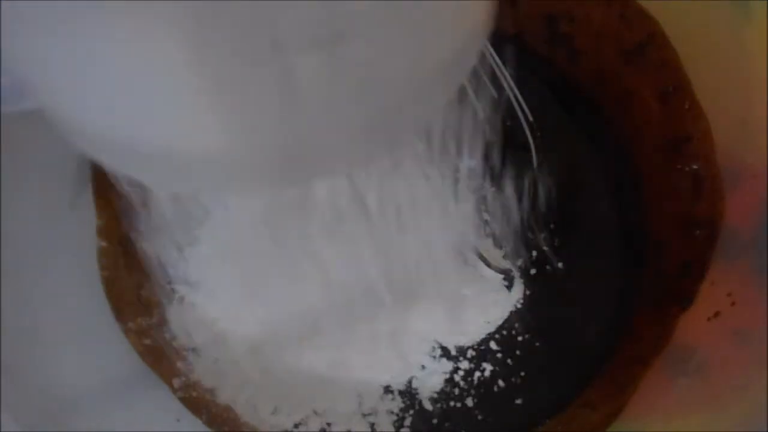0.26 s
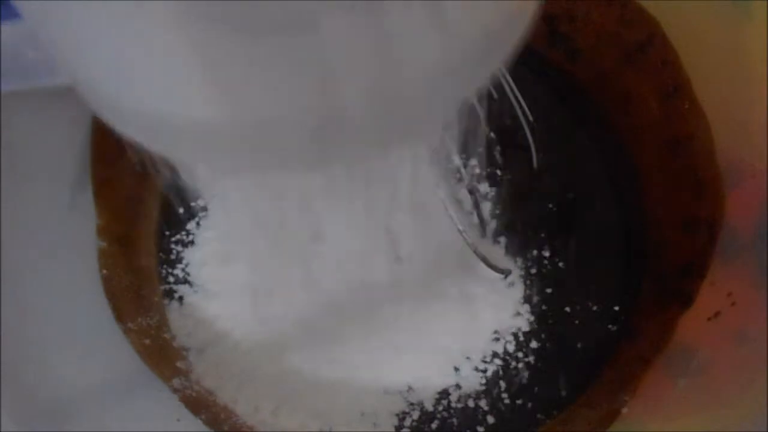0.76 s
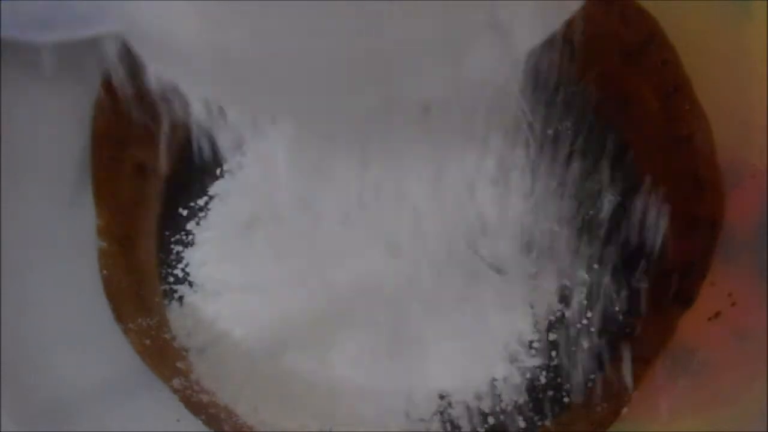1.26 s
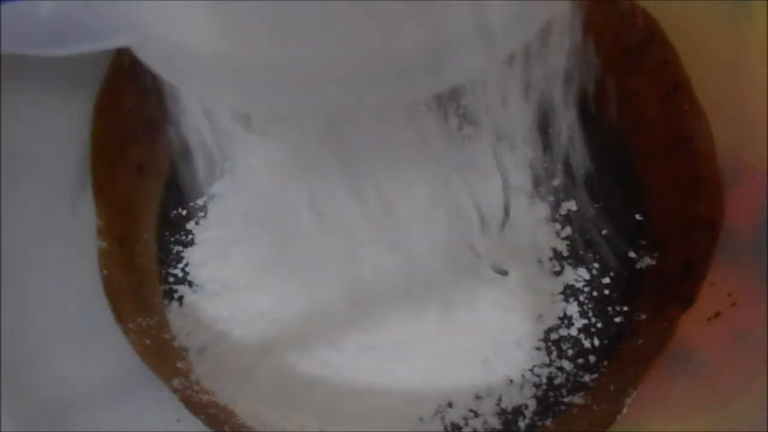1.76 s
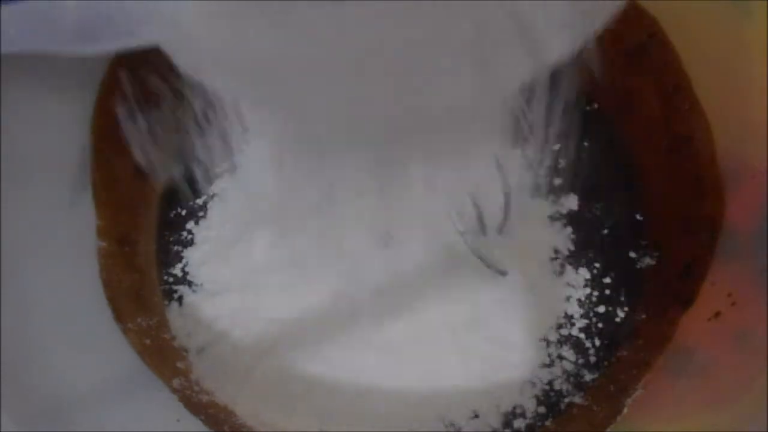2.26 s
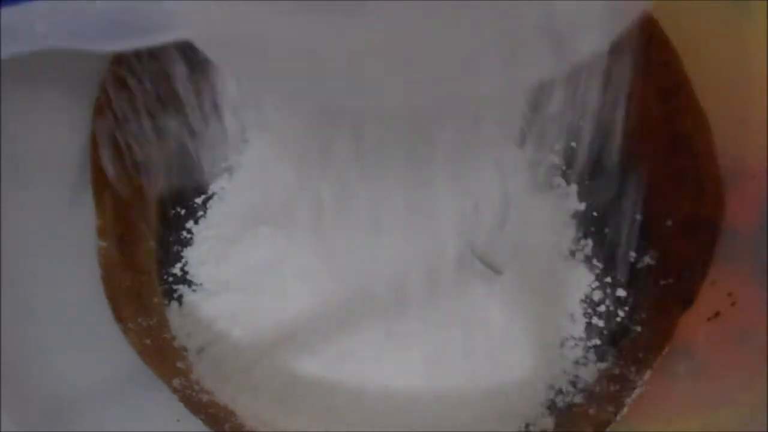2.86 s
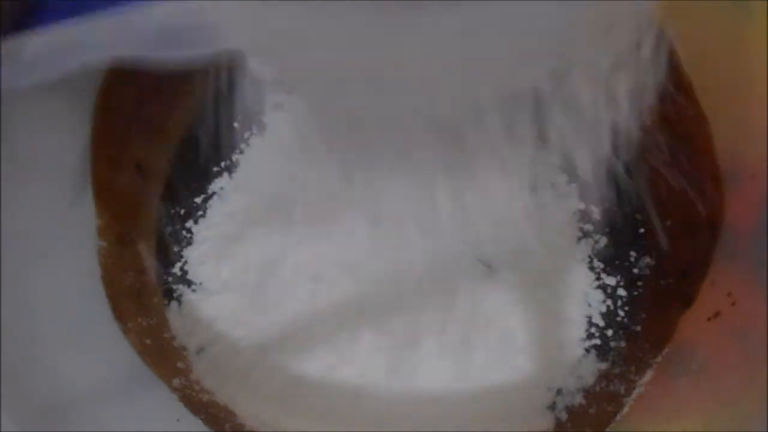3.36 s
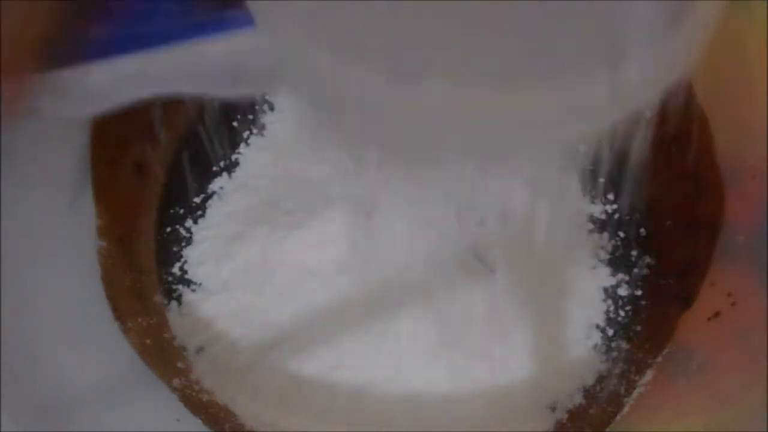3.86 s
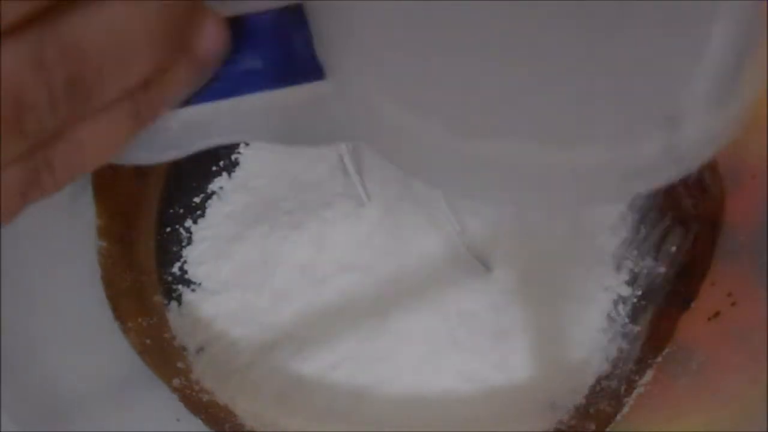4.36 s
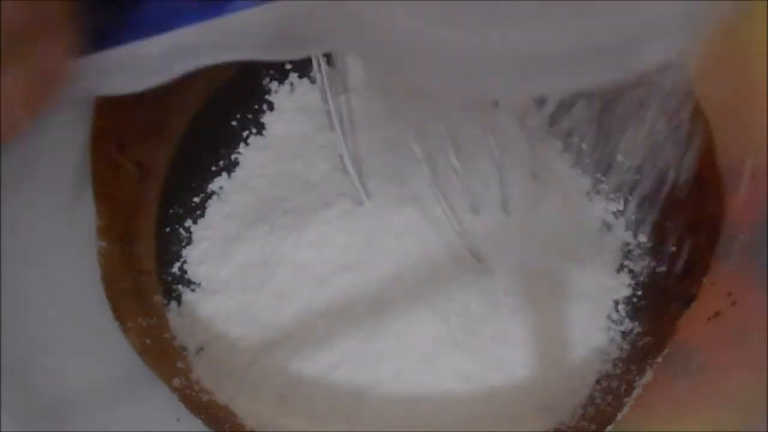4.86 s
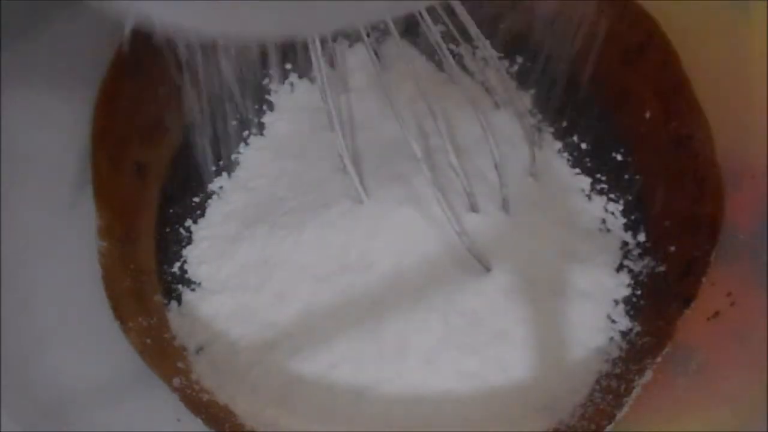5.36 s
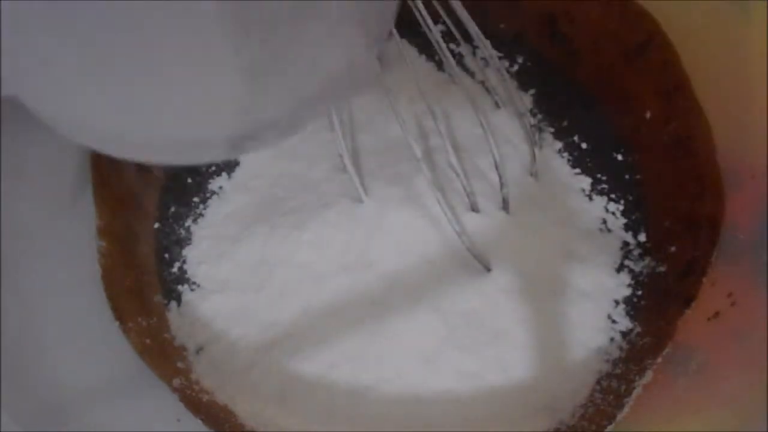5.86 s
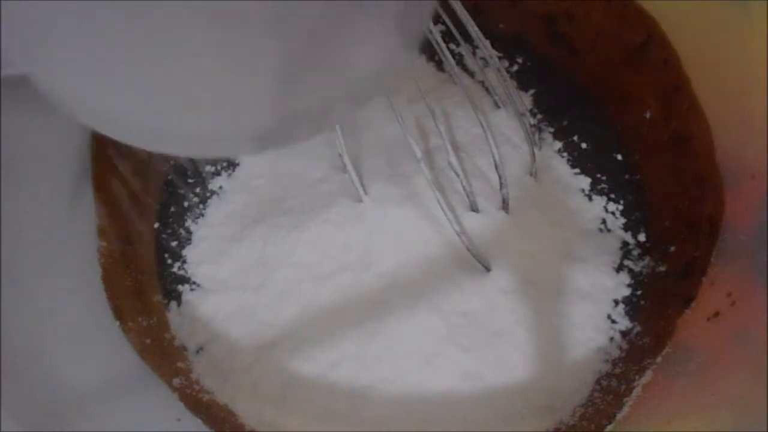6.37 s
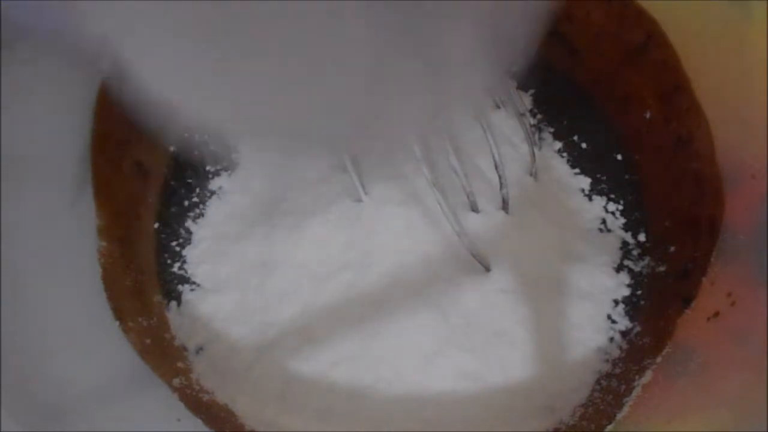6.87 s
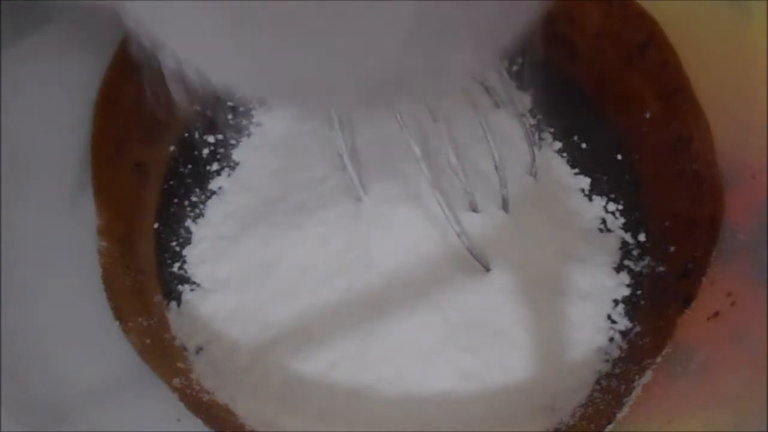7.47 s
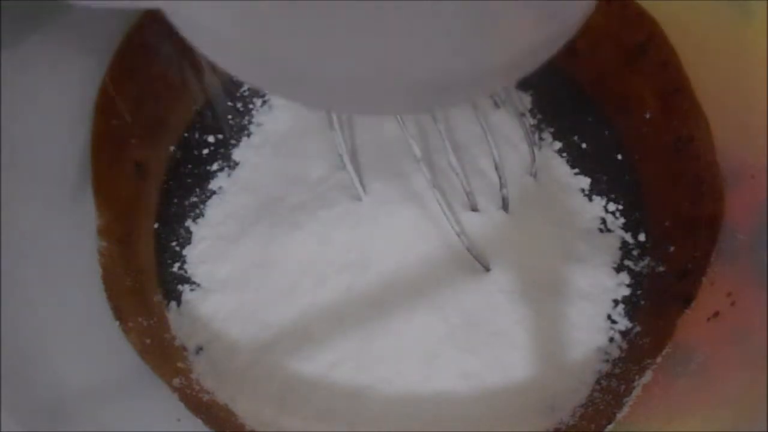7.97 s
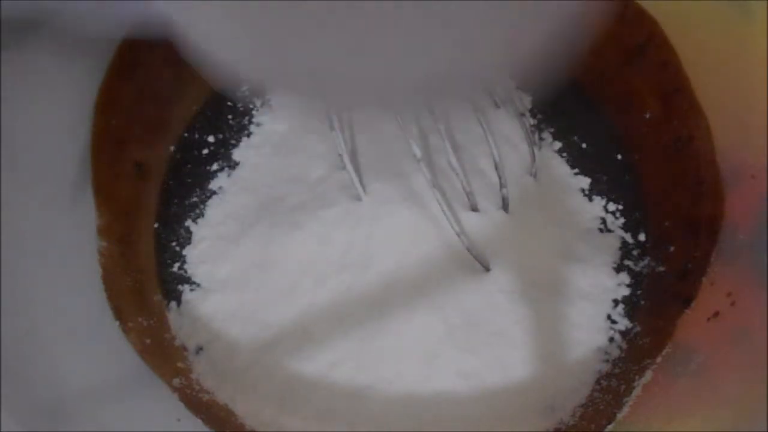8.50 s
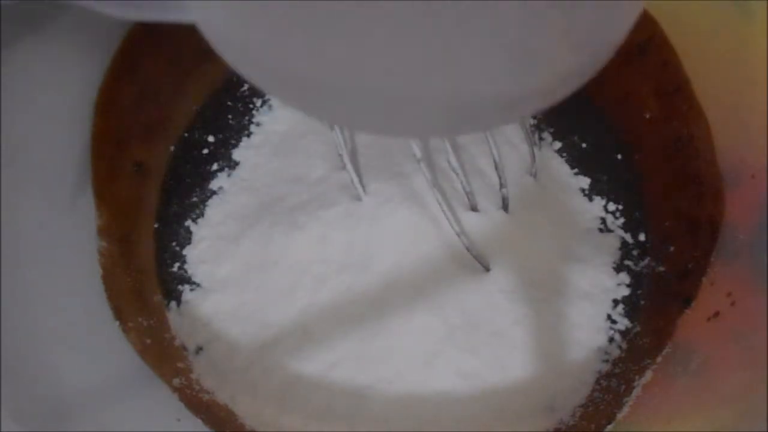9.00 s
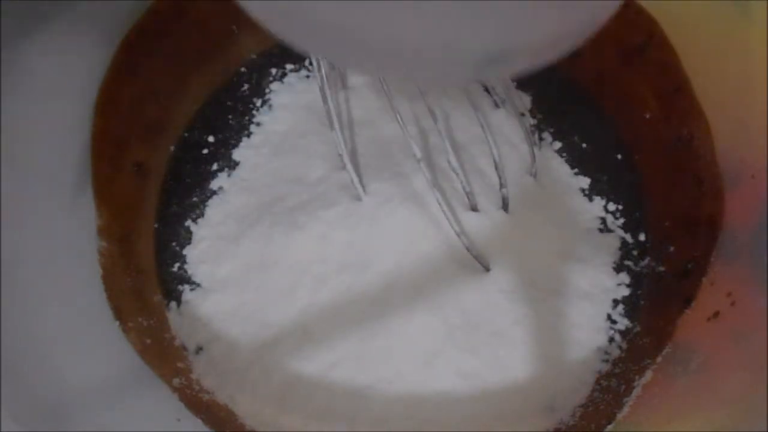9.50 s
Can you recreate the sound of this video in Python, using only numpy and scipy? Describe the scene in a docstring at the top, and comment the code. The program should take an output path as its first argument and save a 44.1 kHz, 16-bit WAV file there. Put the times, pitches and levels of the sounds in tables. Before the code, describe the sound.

Close up in a small kitchen, a hand-held plastic sieve full of flour is shaken about five times a second. At first there are only soft, grainy double swishes with little scrapes and plastic ticks. From around three seconds each shake knocks hard, and the sound grows hollower and buzzier as the flour runs out. Shaking pauses for a few taps, resumes, then ends in sharp separate taps. Short room echoes.

```python
"""In a small kitchen, flour is shaken through a hand-held plastic sieve over a bowl.
Each shake slides the flour across the mesh and back: a shower of tiny random contacts makes two swishes.
As the sieve empties and the shakes harden, it knocks after the push (bursts of contacts ringing the body),
scrapes (short coarse grains) and ticks on the way back (a few wobbly cycles). A few taps free the last flour.
The room adds short echoes, and a faint steady noise lies behind."""
import sys
import numpy as np
from scipy import signal
from scipy.fft import rfft, irfft, next_fast_len
from scipy.io import wavfile
from scipy.ndimage import uniform_filter1d, minimum_filter1d

SR = 44100
rng = np.random.default_rng(int(sys.argv[2]) if len(sys.argv) > 2 else 0)


def wav_record(signal):
    """Record a signal, one row per channel, as 16-bit PCM in the file named by sys.argv[1]."""
    frames = np.transpose(np.atleast_2d(signal))
    bounded = np.clip(frames, -1, 1)
    # unit amplitude maps onto the largest positive 16-bit level
    quanta = np.round(bounded * 32767).astype(np.int16)
    wavfile.write(sys.argv[1], SR, quanta)


N = 429534

# Levels in the event tables set the events against each other; the functions add shared trims.
# one shake each: push_end_s, swish_db, knock_db (None if too gentle to knock), extra_cup_ring_db
SHAKES = [(0.0, -38.5, None, 2), (0.214, -35.5, None, 0), (0.421, -36.5, None, 0), (0.617, -37.5, None, 0),
          (0.809, -36, None, 0), (0.998, -33.5, None, 0), (1.173, -31, None, 0), (1.358, -35.5, None, 2),
          (1.537, -35.5, None, 0), (1.728, -37, None, 0), (1.921, -35, None, 0), (2.113, -33, None, 0),
          (2.317, -33.5, None, 0), (2.532, -34, None, 0), (2.7315, -33, -24.5, 6), (2.9346, -33.5, -21, 4),
          (3.136, -31.5, None, 0), (3.3409, -33.5, -16.5, -2.5), (3.5357, -36, -17.5, 1),
          (3.7419, -34, -17, -1), (3.9409, -33.5, -16.5, 0), (4.1574, -30, -17.5, -1.5),
          (4.3717, -30, -17.5, -1.5), (4.596, -32.5, -17.5, -3), (4.8206, -31.5, -18.5, -2.5),
          (5.0525, -32, -18, -1), (5.2916, -33.5, -23, 7.5), (5.528, -32.5, -20, 2.5),
          (5.7756, -30, -20, 0.5), (6.0307, -30, -20.5, -1.5), (6.254, -29.5, -21.5, -2),
          (6.4702, -32, -21.5, -1.5), (6.995, -36, None, 0), (7.1376, -30, -22, 1.5),
          (7.3751, -31, -22, 0.5), (7.5947, -30.5, -21, -.5), (7.831, -29.5, -21.5, 2),
          (8.0634, -29, -21.5, 0.5), (8.287, -30.5, -20.5, -1), (8.4997, -31.5, -22, 0),
          (8.7129, -29, -21.5, -0.5), (9.617, -33, -22, 1)]
# flour left in the sieve: time_s, share_0_to_1
FILL = [(0, 1), (3.6, 0.7), (4.4, 0.3), (5.2, 0.07), (9.7, 0)]
# share of the mesh that lies bare: time_s, share_0_to_1
BARE = [(0, 0), (5.3, 0.16), (6.3, 0.67), (7.1, 1)]
# resonances of the sieve and the bowl under it: pitch_hz, width_hz, full_lift_db (each sound takes a part of it)
MODES = [(451.7, 28.7, 13), (496.4, 57, 12), (567, 42, 8.5), (627, 22, 5.5), (1005, 69, 9), (1131, 65, 7.5),
         (2097, 275, 7), (2630, 160, 5.5), (2992, 216, 7), (3392, 85, 7.5), (4320, 280, 3.5),
         (5170, 180, 2.5), (6200, 180, 1.5)]
# tone of flour rubbing on the mesh: pitch_hz, level_db (per Hz)
SWISH = [(40, -47), (150, -30.5), (300, -19.5), (500, -11.5), (800, 0), (1050, 3.5), (1500, 1), (2100, 3.5),
         (3200, 1.5), (4800, 3), (6500, 0.5), (8800, -4.5), (10000, -13.5), (11000, -40)]
# tone of the room's echoes: pitch_hz, level_db (per Hz)
ROOM_COLOUR = [(60, -10), (300, -3.5), (560, 5.5), (1100, 6), (1700, 2), (3000, -1.5), (7000, -0.5),
               (11000, -2.5)]
# tone of the faint background: pitch_hz, level_db (per Hz)
QUIET = [(30, -12), (100, -8), (200, 5), (500, 5), (1500, 4.5), (5000, -4), (10000, -26)]
# registers of a knock, one row each for thump, hollow, wall, clack, mesh: low_hz, high_hz
REGISTERS = [(60, 350), (350, 720), (720, 1600), (1600, 3800), (3800, 11000)]
# tone of hard contacts before the body rings: pitch_hz, level_db (per Hz)
CONTACT = [(40, -23.5), (150, -10), (350, -3.5), (800, -1), (1100, -3), (1550, -5), (2800, 4.5), (4000, 1),
           (6000, 2), (8000, -3.5), (10000, -16), (11000, -39)]
# light knocks of the sieve swinging loose, mostly on the rebound: start_s, level_db
REBOUNDS = [(0.377, -33), (7.2031, -31), (7.4331, -28.5), (7.6538, -32.5), (7.8915, -32.5), (8.1174, -28.5),
            (8.3239, -29), (8.5466, -32.5), (9.3871, -36)]
# taps that free the last flour: start_s, thump_db, ring_db, crack_db
TAPS = [(6.6483, -33.5, -30, -28), (6.8563, -39.5, -30, -31), (7.022, -38.5, -29.5, -39.5),
        (7.7632, -44, -38.5, -36), (8.8409, -33.5, -29.5, -19.5), (9.132, -37, -28.5, -24),
        (9.4081, -38, -25.5, -24.5), (9.6956, -45, -25.5, -26.5)]
# balance of a knock against its own level: thump_db, hollow_db, wall_db, clack_db, mesh_db
KNOCK_COLOUR = [-26, -9, -9, 0, -11]
# balance of a rebound, in the same columns
REBOUND_COLOUR = [-17.5, -11.5, -7, -0.5, -3]
# what a full cup adds to any blow, in the same columns
FULL_SHIFT = [-10, -12, 0, 0, -2.5]
# what bare mesh adds to a knock, in the same columns
BARE_SHIFT = [4.5, 3, 2, 1, 9]
# a glancing knock rings the cup and hardly thumps: dB per dB of extra ring, for the same five registers
RING_SHIFT = [-1.45, 0.44, 0.82, -0.037, -0.29]
# single scrapes of the sieve, besides those around each knock: start_s, level_db
SCRAPES = [(0.4225, -23.5), (0.7634, -20), (0.8664, -21.5), (1.0013, -17.5), (1.1462, -21), (1.1958, -15),
           (1.498, -19.5), (3.1344, -15.5), (7.3284, -20.5), (7.394, -17), (7.9223, -18), (8.485, -19),
           (8.7304, -12)]
# tone of plastic scraping: pitch_hz, level_db (per Hz)
SCRAPE = [(100, -35.5), (400, -10), (1000, 8.5), (1500, -3.5), (2300, 8), (4300, 2), (6000, -6.5),
          (9000, -14.5), (11000, -37)]
# plastic ticks at the end of the pull: start_s, level_db
TICKS = [(1.087, -24.5), (1.256, -16.5), (1.446, -27.5), (2.0057, -15.5), (2.211, -19), (2.4232, -17.5),
         (2.6372, -23.5), (2.826, -15.5), (3.0274, -14), (3.223, -10.5), (3.642, -21.5), (4.0424, -14.5),
         (4.2565, -15), (4.4757, -14), (4.7085, -15.5), (4.9297, -13.5), (5.161, -12), (5.4003, -18),
         (5.6375, -11.5), (5.894, -14.5), (6.1265, -19), (6.3649, -21), (7.7167, -22), (7.9424, -18.5),
         (8.5937, -16)]

# the push: how long the flour slides, gathers speed and stops; bare mesh adds to the time it gathers speed
PUSH_S, PUSH_ATTACK_S, BARE_ATTACK_S, PUSH_RELEASE_S, PUSH_DB = 0.05, 0.02, 0.012, 0.016, -0.5
# the pull, timed from the end of the push: it dies away by itself unless a tick stops it short
PULL_START_S, PULL_ATTACK_S, PULL_RELEASE_S, PULL_END_S, TICK_STOP_S = 0.022, 0.027, 0.054, 0.13, 0.0065
PULL_DB, BARE_PULL_DB, PULL_SAG_DB_PER_S = -2.5, -9, -47.5
# base contact times; flour deadens a knock, bare mesh buzzes on
KNOCK_S, BARE_KNOCK_S, REBOUND_S, TAP_S = 0.0031, 0.013, 0.0054, 0.0051
# a knocking shake may catch just before its knock and settles just after it; dB against the knock
CATCH_S, CATCH_CHANCE, CATCH_DB = 0.031, 0.58, -1
SETTLE_S, SETTLE_DB = 0.042, 2.5
BARE_SCRAPE_DB, SCRAPE_JITTER_S = -16, 0.003  # bare mesh makes these scrapes weaker
TICK_HZ = 2106  # centre pitch; each tick wobbles around it
ROOM_T60_S, ROOM_DB = 0.51, -15  # time for the echo to fall by 60 dB, and its level
QUIET_DB = -64
CUTOFF_HZ = 10600


def from_db(db):
    """Turn decibels into a gain."""
    return 10 ** (np.asarray(db) / 20)


def rms_one(x):
    """Scale a signal to an average strength (rms) of 1."""
    return x / np.sqrt(np.mean(x ** 2) + 1e-20)


def add(out, s, sound):
    """Mix a sound into out, starting at s seconds."""
    i = max(round(s * SR), 0)
    out[i:i + len(sound)] += sound[:max(N - i, 0)]


def share(curve, s):
    """Read a 0-to-1 curve at a time in seconds."""
    return np.clip(np.interp(s, *np.transpose(curve)), 0, 1)


def drift(rate):
    """Random wandering with rms 1: a new target so many times a second, joined by straight lines."""
    targets = rng.standard_normal(N // 20)
    return rms_one(np.interp(np.arange(N) / SR * rate, np.arange(N // 20), targets))


def coloured(x, spectrum):
    """Shape a signal's tone by scaling its frequencies; the result has rms 1."""
    hz, db = np.transpose(spectrum)
    size = next_fast_len(len(x))
    bins = np.maximum(np.arange(size // 2 + 1) * SR / size, 1)
    gain = from_db(np.interp(np.log(bins), np.log(hz), db))
    return rms_one(irfft(rfft(x, size) * gain, size)[:len(x)])


def grains(per_s, spread_db):
    """A dense shower of tiny contacts of uneven size and random sign; rms 1."""
    sizes = from_db(spread_db * np.clip(rng.standard_normal(N), -3, 2.5))
    sizes = sizes * rng.choice([-1, 1], N)
    return rms_one(sizes * (rng.random(N) < per_s / SR))


def body(x, coupling, fill):
    """Each resonance lifts its own band and rings on; flour lying in the cup damps the lowest ones."""
    sections = []
    for hz, width, lift_db in MODES:
        damping = np.clip(fill, 0, 1) / (1 + (hz / 750) ** 6)
        pole = np.pi * width / SR
        zero = pole * from_db(lift_db * coupling * (1 - damping))
        turn = -2 * np.cos(2 * np.pi * hz / SR)
        sections.append(np.array([1 + zero, turn, 1 - zero, 1 + pole, turn, 1 - pole]) / (1 + pole))
    return signal.sosfilt(sections, x + 1e-18)


def slide(start, end, attack_s, release_s, sag_db_per_s=0):
    """Loudness of one slide of the flour: it gathers speed, holds or sags, and comes to rest."""
    t = np.arange(max(start, 0), end, 1 / SR)
    rise = np.minimum((t - start) / attack_s, 1)
    fall = np.minimum((end - t) / release_s, 1)
    return rise * fall * from_db(sag_db_per_s * (t - start))


def strokes(reach_s=0.13):
    """Loudness of the pushes and of the pulls; over bare mesh the pull is weak."""
    push, pull = np.zeros((2, N))
    for s, db, _, _ in SHAKES:
        bare = share(BARE, s)
        forth = slide(s - PUSH_S, s + PUSH_RELEASE_S, PUSH_ATTACK_S + bare * BARE_ATTACK_S, PUSH_RELEASE_S)
        add(push, s - PUSH_S, from_db(db + PUSH_DB) * forth)
        # the first tick within reach stops the pull
        stops = [(at + TICK_STOP_S, TICK_STOP_S) for at, _ in TICKS if s < at < s + reach_s]
        end, release_s = stops[0] if stops else (s + PULL_END_S, PULL_RELEASE_S)
        back = slide(s + PULL_START_S, end, PULL_ATTACK_S, release_s, PULL_SAG_DB_PER_S)
        add(pull, s + PULL_START_S, from_db(db + PULL_DB + bare * BARE_PULL_DB) * back)
    return push, pull


def flour(bare_scuff_db=-3, bare_hiss_db=1, lumps_db=1.0):
    """Flour rubs over the mesh twice a shake; lumps flutter; emptying makes it thinner and hollower."""
    push, pull = strokes()
    t = np.arange(N) / SR
    fill, bare = share(FILL, t), share(BARE, t)
    rub = coloured(grains(per_s=9000, spread_db=4.5), SWISH)
    # split the rub into a dull part and a bright rest, each with its own flicker
    dull = signal.sosfilt(signal.butter(1, 2500, fs=SR, output="sos"), rub)
    bright = rub - dull
    hiss_level = from_db(1.1) * push + from_db(2.6) * pull
    hiss = bright * hiss_level * from_db(2.1 * drift(170) + bare * bare_hiss_db)
    scuff_level = from_db(1.2) * push + from_db(1.9) * pull
    scuff = dull * scuff_level * from_db(2.8 * drift(120) + bare * bare_scuff_db)
    flutter = from_db(1.3 * drift(250) + fill * lumps_db * drift(45))
    swish = from_db(-1.5) * (hiss + scuff) * flutter
    full_cup = body(swish, coupling=0.65, fill=0.54)
    empty_cup = body(swish, coupling=0.64, fill=0)
    return fill * full_cup + (1 - fill) * empty_cup


def kitchen(x, build_s=0.0046, places_per_s=24.0, count=6):
    """Diffuse reflections build up and die away; their pattern changes as the sieve moves between places."""
    t = np.arange(int(0.7 * SR)) / SR
    decay = from_db(-60 * t / ROOM_T60_S) * (1 - np.exp(-(t / build_s) ** 2))
    place, out = np.arange(N) / SR * places_per_s, 0
    for k in range(count):
        # fade from one place's echo pattern to the next, over and over
        nearness = np.sqrt(np.maximum(1 - np.abs((place + k) % count - 1), 0))
        tail = coloured(rng.standard_normal(len(t)), ROOM_COLOUR) * decay
        out = out + nearness * signal.fftconvolve(x, tail / np.linalg.norm(tail))[:N]
    return from_db(ROOM_DB) * out


def background():
    """A faint steady noise, strongest in the low and middle pitches."""
    return from_db(QUIET_DB) * coloured(rng.standard_normal(N), QUIET)


def strikes(tap_wall_db=-1.5, tap_mesh_db=-0.5):
    """List every knock, rebound and tap: start_s, level_db in each register, contact_s."""
    rows = []
    for s, _, db, ring_db in SHAKES:
        if db is not None:
            bare = share(BARE, s)
            colour = np.array(KNOCK_COLOUR) + bare * np.array(BARE_SHIFT) + ring_db * np.array(RING_SHIFT)
            rows.append((s, db + colour, KNOCK_S + bare * (BARE_KNOCK_S - KNOCK_S)))
    for s, db in REBOUNDS:
        rows.append((s, db + np.array(REBOUND_COLOUR), REBOUND_S))
    for s, thump, ring, crack in TAPS:
        wall, mesh = (ring + crack) / 2 + tap_wall_db, crack + tap_mesh_db
        rows.append((s, np.array([thump, ring, wall, crack, mesh]), TAP_S))
    return rows


def knocks(hold=1.12, steepness=1.36, rattle_db=-15, rattle_s=0.013, rise_s=0.00031):
    """A blow is a crunch of contacts a few ms long, longer on bare mesh, plus a short rattle; the body rings."""
    out, t = np.zeros(N), np.arange(SR // 8) / SR
    attack = int(0.03 * SR)  # each register is levelled by its first 30 ms
    crunch = coloured(grains(per_s=16000, spread_db=3.0), CONTACT)
    filters = [signal.butter(3, band, "band", fs=SR, output="sos") for band in REGISTERS]
    for k, (s, levels_db, contact_s) in enumerate(strikes()):
        fill = share(FILL, s)
        main_force = np.exp(-(t / (hold * contact_s)) ** steepness)
        rattle = from_db(rattle_db - 2 * fill) * np.exp(-t / rattle_s)
        force = (main_force + rattle) * (1 - np.exp(-t / rise_s))
        own_crunch = crunch[k * len(t):(k + 1) * len(t)]
        blow = body(force * own_crunch, coupling=0.89, fill=fill)
        for sos, db in zip(filters, levels_db + fill * np.array(FULL_SHIFT)):
            part = signal.sosfilt(sos, blow)
            add(out, s, from_db(db + 1.52) * part / np.std(part[:attack]))
    return out


def catches():
    """List the scrapes around each knock: start_s, level_db."""
    rows = []
    lucks = rng.random(len(SHAKES))
    jitters = rng.normal(0, SCRAPE_JITTER_S, (len(SHAKES), 2))
    for (s, _, db, _), luck, (early, late) in zip(SHAKES, lucks, jitters):
        if db is not None:
            level = db + share(BARE, s) * BARE_SCRAPE_DB
            rows.append((s + SETTLE_S + late, level + SETTLE_DB))
            if luck < CATCH_CHANCE:
                rows.append((s - CATCH_S + early, level + CATCH_DB))
    return rows


def scrapes(length_s=0.004, level_db=-9):
    """A brief catch of plastic on the mesh: coarse grains that swell and fade."""
    force, t = np.zeros(N), np.arange(SR // 16) / SR
    swell = 2 * np.sqrt(t / length_s) * np.exp(-t / length_s)
    for s, db in SCRAPES + catches():
        add(force, s, from_db(db + level_db) * swell)
    coarse = coloured(grains(per_s=10000, spread_db=2.0), SCRAPE)
    return body(force * coarse, coupling=0.28, fill=0.39)


def ticks(length_s=0.0069, scratch_db=-7, level_db=-4.0, overtone=2.6, overtone_db=-15):
    """Plastic slips on plastic: a handful of uneven cycles that swell and stop, with some scratch."""
    out, t = np.zeros(N), np.arange(SR // 100) / SR
    scratch = coloured(rng.standard_normal(N), SCRAPE)
    unsteady = 0.038 * drift(1500)  # pitch wobble, as a share of the pitch
    swell = np.sin(np.pi * np.minimum(t / length_s, 1) ** 0.53) ** 2
    for k, (s, db) in enumerate(TICKS):
        own = slice(k * len(t), (k + 1) * len(t))
        phase = 2 * np.pi * np.cumsum(TICK_HZ * (1 + unsteady[own])) / SR
        tone = np.sin(phase) + from_db(overtone_db) * np.sin(overtone * phase)
        slip = tone + from_db(scratch_db) * scratch[own]
        add(out, s, from_db(db + level_db) * slip * swell)
    return out


def scene():
    """The sieve close by, its room, and a faint background."""
    rubbing = flour() + scrapes()
    blows = knocks() + ticks()
    # a cup full of flour throws less of each blow into the room
    spread = from_db(-3.5 * share(FILL, np.arange(N) / SR))
    room = kitchen(rubbing + spread * blows)
    return (rubbing + blows + room + background())[None]


def record(dry, ceiling=0.54):
    """A fast limiter holds the loudest peaks down, then the top of the treble is cut."""
    gain = np.minimum(1, ceiling / (np.abs(dry) + 1e-9))
    # hold each dip for about 1 ms, then smooth it
    gain = uniform_filter1d(minimum_filter1d(gain, size=45), size=45)
    low_pass = signal.ellip(10, 0.1, 70, CUTOFF_HZ, fs=SR, output="sos")
    return signal.sosfilt(low_pass, dry * gain)


dry = scene()
out = record(dry)
wav_record(out)
```